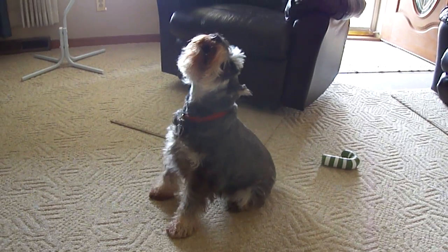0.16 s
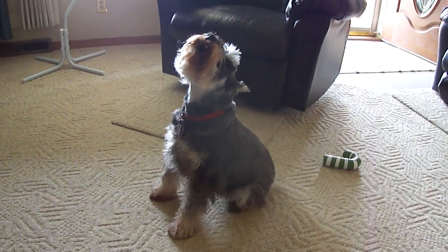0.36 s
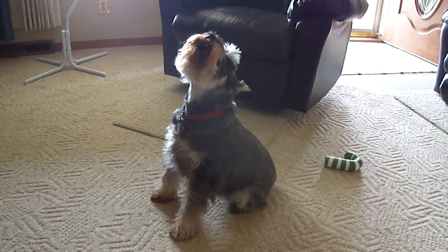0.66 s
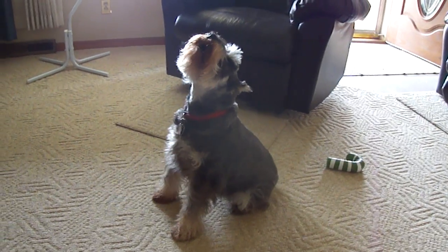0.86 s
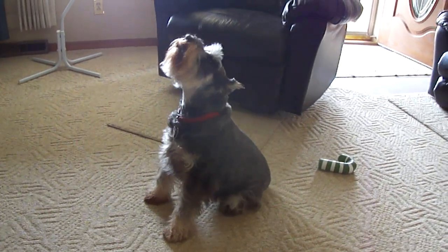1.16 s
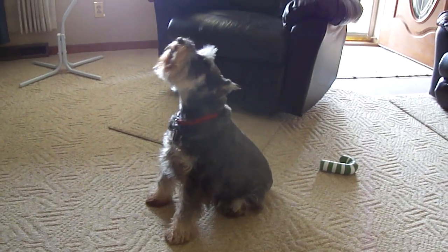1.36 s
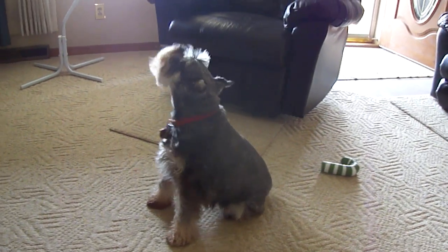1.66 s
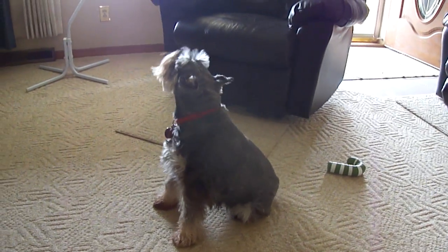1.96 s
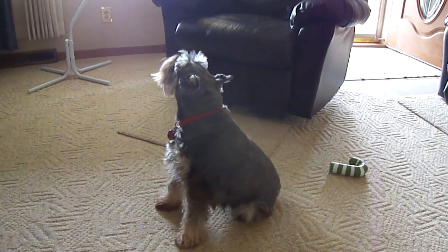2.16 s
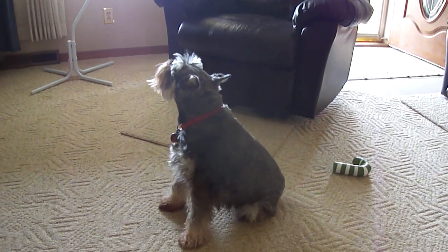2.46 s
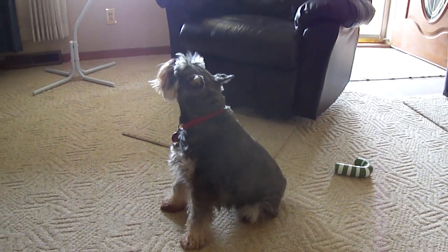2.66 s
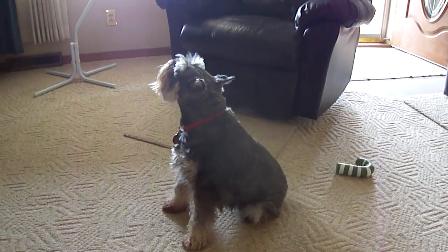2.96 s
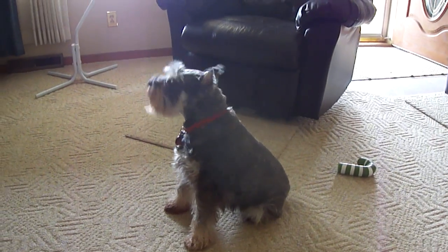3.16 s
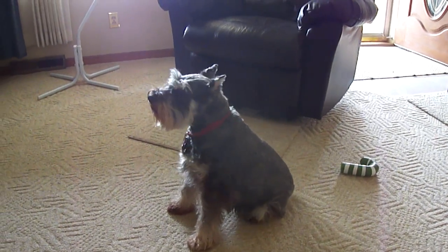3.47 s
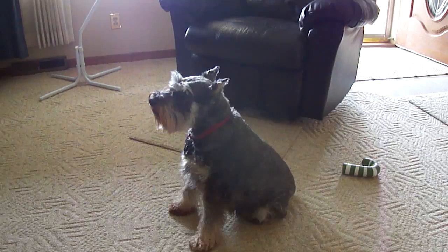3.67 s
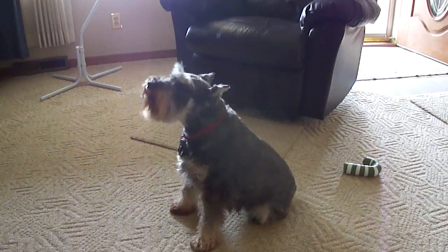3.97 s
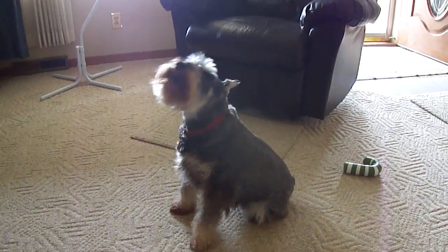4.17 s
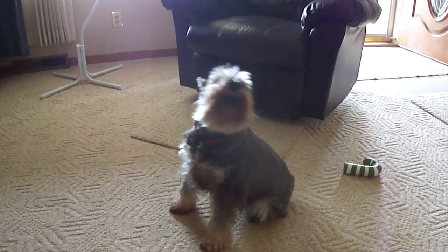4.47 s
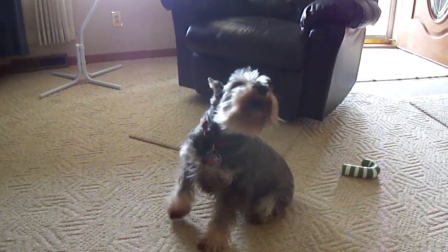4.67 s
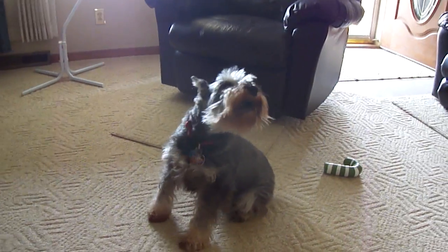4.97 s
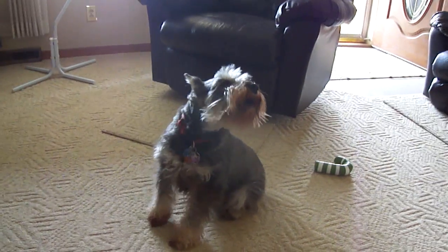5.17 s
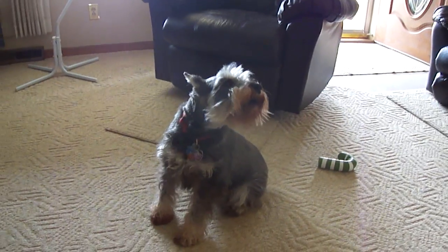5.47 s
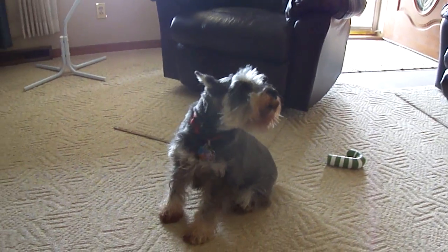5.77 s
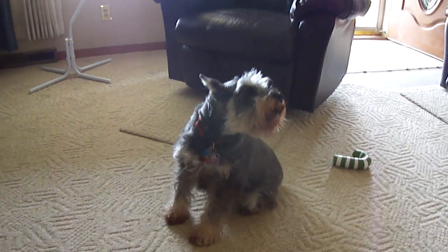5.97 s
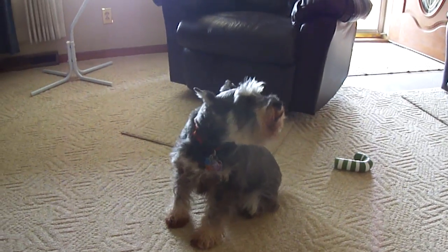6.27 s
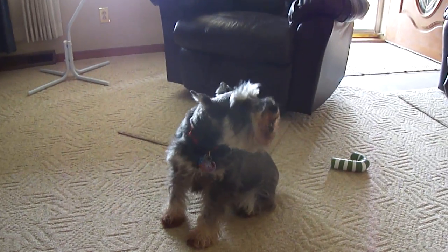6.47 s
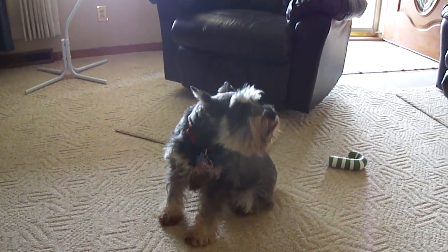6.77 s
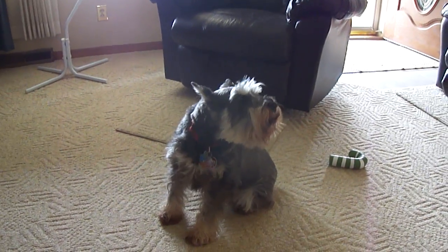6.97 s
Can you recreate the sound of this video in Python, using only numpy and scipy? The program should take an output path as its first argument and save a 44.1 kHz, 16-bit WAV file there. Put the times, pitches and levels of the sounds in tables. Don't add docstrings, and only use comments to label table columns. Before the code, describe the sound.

Three dogs vocalise together indoors. The nearest gives a long, fairly clear howl, then rapid rising and falling wails with hoarse edges, a second long sustained howl, and a final waver. Another dog adds brief, broken, high squeals and whines; a third howls lower and barks gruffly through a doorway. The microphone is close and slightly overloaded on loud notes, with short dull room echoes, low puffs and faint hiss.

```python
import sys
import numpy as np
from scipy import signal
from scipy.fft import rfft, irfft, next_fast_len
from scipy.io import wavfile
from scipy.ndimage import uniform_filter1d

SR = 44100
rng = np.random.default_rng(int(sys.argv[2]) if len(sys.argv) > 2 else 0)


def to_wav(sig):
    pcm = np.clip(np.atleast_2d(sig), -1, 1) * 32767
    pcm = np.round(pcm).astype(np.int16)
    wavfile.write(sys.argv[1], SR, pcm.T)


def to_linear_factor(level_db):
    exponent = np.asarray(level_db, float) / 20
    return 10 ** exponent


N = 313992
CUTOFF_HZ = 11050


def rms_one(x):
    return x / np.sqrt(np.mean(np.abs(x) ** 2) + 1e-20)


def loudness(x):
    return np.sqrt(np.abs(uniform_filter1d(x ** 2, size=500)))


def at_hz(points, hz):
    curve_hz, curve_db = np.array(points)[:, 0], np.array(points)[:, 1]
    return np.interp(np.log(hz), np.log(curve_hz), curve_db)


def in_span(rows, fade_s):
    s, *columns = np.transpose(rows)
    at = np.arange(int(s[0] * SR), min(int(s[-1] * SR), N))
    t = at / SR
    cut_at_start, cut_at_end = s[0] < .005, s[-1] > N / SR - .005
    rise = np.clip((t - s[0] + cut_at_start) / fade_s, 0, 1)
    fall = np.clip((s[-1] - t + cut_at_end) / fade_s, 0, 1)
    return at, [np.interp(t, s, c) for c in columns], rise * fall


def wobble(width_hz):
    white = rng.standard_normal(N) + 1j * rng.standard_normal(N)
    return rms_one(signal.sosfilt(signal.butter(3, width_hz, fs=SR, output="sos"), white))


def coloured(spectrum):
    size = next_fast_len(N)
    hz = np.maximum(np.arange(size // 2 + 1) * SR / size, 1)
    white = rfft(rng.standard_normal(size))
    return rms_one(irfft(white * to_linear_factor(at_hz(spectrum, hz)), size)[:N])


def near_phrases():
    # time_s, pitch_hz, effort_db, mouth_db
    # (mouth_db is the mouth opening: 2nd partial against effort)
    long_howls = [
        [(0.0, 564.7, -13, -10), (0.22, 473.6, -13, -14.5), (0.35, 564, -15.5, -0.5), (0.52, 580.5, -15, -3.5),
         (0.6, 554.5, -16, -3.5), (0.75, 596.7, -11.5, -8), (0.9, 575.6, -19.5, -3), (1.0, 588.2, -14, -14),
         (1.08, 459, -27.5, -12.5)],
        [(3.9, 471, -19.5, -6.5), (3.95, 577.5, -23.5, 3.5), (4.0, 625, -23.5, 1.5), (4.07, 582.4, -19.5, 2),
         (4.15, 672.4, -18, -1), (4.3, 639.3, -20, 1.5)],
        [(4.288, 636, -19.5, -2), (4.45, 653.6, -24.5, 8.5), (4.6, 623, -13.5, -9), (4.79, 611.8, -18.5, 1.5),
         (5.0, 590.2, -6.5, -21.5), (5.2, 579.2, -16, -15), (5.3, 594.9, -9.5, -19.5), (5.58, 557.8, -18.5, -6),
         (5.72, 465, -30.5, 5.5)],
    ]
    # time_s, pitch_hz, effort_db, mouth_db
    wavers = [
        [(1.54, 487.4, -14, -5), (1.62, 733.4, -29, -4), (1.84, 534.8, -21.5, -1), (1.9, 716, -19.5, -3),
         (1.96, 764, -19.5, -2), (2.18, 500, -22.5, -2), (2.245, 628.4, -13.5, -6), (2.3, 655.7, -20.5, -1.5),
         (2.5, 416.7, -22, -6)],
        [(2.66, 605, -4.5, -18), (2.7, 599, -20.5, -5.5), (2.84, 492, -18.5, -7), (2.94, 479.5, -16.5, -17),
         (3.0, 674.4, -20.5, -9), (3.05, 704.2, -22.5, 1.5), (3.2, 419, -26, -6), (3.34, 330.7, -35, -13.5)],
        [(6.14, 644, -20, 1), (6.22, 727.5, -21, -10), (6.37, 498.8, -21.5, -5.5), (6.425, 700.5, -22.5, -2),
         (6.48, 802.7, -21, 0.5), (6.67, 529.6, -23.5, -5), (6.79, 620.6, -13, -6.5), (6.9, 589, -10, -23),
         (7.12, 560.4, -24.5, -1)],
    ]
    # start_db, halfway_db, end_db
    open_levels = [
        (-38.5, -39, -7),
        (-11.5, -19.5, -18.5),
        (-29, -32, -17),
        (-22.5, -17.5, -27.5),
        (2, -4.5, -8),
        (-20, -19.5, -23.5),
    ]
    roughness = [
        (.055, 0),
        (.09, .33),
        (.03, .06),
        (.1, .06),
        (.11, .06),
        (.025, .3),
    ]
    # pitch_hz, change_db
    chest = [(335, -9), (450, -16.5), (500, -15.5), (570, -4.5), (650, 1.5), (800, 1.9)]
    rise_lean, fall_lean = .85, 0.92
    recover_per_s = 1.8

    roundness = [0.49] * len(long_howls) + [0.818] * len(wavers)
    calls, hoarseness = [], np.zeros(N)
    for points, open_db, (calm, catch), rounded in zip(long_howls + wavers, open_levels, roughness, roundness):
        s, turn_hz, effort_db, mouth_db = np.transpose(points)
        t = np.linspace(s[0], s[-1], int((s[-1] - s[0]) * 200))

        place = np.interp(t, s, np.arange(len(s)))
        leg = np.minimum(place.astype(int), len(s) - 2)
        climb = turn_hz[leg + 1] - turn_hz[leg]
        gone = (place - leg) ** np.where(climb > 0, rise_lean, fall_lean)
        hz = turn_hz[leg] + climb * (rounded * np.sin(np.pi / 2 * gone) ** 2 + (1 - rounded) * gone)

        strain = .4 * np.interp(hz, (660, 730), [0, 1])
        strain = np.maximum.accumulate(strain + recover_per_s * t) - recover_per_s * t
        slack = .28 * np.interp(-hz, (-495, -420), [0, 1])
        caught = catch * np.exp(-((t - s[0] - .07) / .05) ** 2)
        hoarse = np.minimum(calm + strain + slack + caught, .5)

        leap = np.clip(np.gradient(hz, t) / 1000, 0, 4)
        first_db = np.interp(t, s, effort_db) + leap + at_hz(chest, hz)
        second_db = np.interp(t, s, effort_db + mouth_db) + leap
        opening_db = np.interp(t, np.linspace(s[0], s[-1], len(open_db)), open_db)
        third_db = second_db + opening_db + 2.5 * leap + 3.5 * hoarse
        calls.append(np.transpose([t, hz, first_db, second_db, third_db]))
        at = np.arange(int(s[0] * SR), min(int(s[-1] * SR), N))
        hoarseness[at] = np.interp(at / SR, t, hoarse)
    return calls, hoarseness


def howl(calls, hoarseness, lift_db, count):
    # frequency_hz, level_db
    upper_colour = [(1800, 12.5), (2400, -8), (3000, -8), (3500, -10.5), (3900, -25.5), (5200, -18),
                    (6000, -37.5), (7600, -20), (9000, -28), (11000, -20.5)]
    out = np.zeros(N)
    chance = [wobble(100.0), wobble(210.0)]
    waver = wobble(5).real
    for rows in calls:
        at, (hz, first_db, second_db, third_db), edge = in_span(rows, fade_s=.012)
        hz = uniform_filter1d(hz, size=1100, mode="nearest")
        phase = 2 * np.pi * np.cumsum(hz) / SR
        mid_db = 0.91 * third_db + 0.27 * (second_db - 12)
        top_db = 0.37 * third_db + 0.69 * (second_db - 25.0)
        for k in range(1, count + 1):
            if k <= 3:
                db = [first_db, second_db, third_db][k - 1]
            else:
                force_db = np.where(k * hz > 4500, top_db, mid_db)
                db = force_db + at_hz(upper_colour, k * hz) + 8.8 * np.roll(waver, 9973 * k)[at]
            spread = np.clip(hoarseness[at] * (k - .6) ** .7, 0, .96)
            thirds = 2.2 * (k > 1) * hoarseness[at] * np.cos(phase / 3 + k)
            uneven = .75 * np.roll(chance[k > 1], 977 * k)[at] + thirds
            flow = np.sqrt(1 - spread ** 2) + spread * uneven
            heard = edge * (k * hz < CUTOFF_HZ)
            out[at] += heard * to_linear_factor(db + lift_db) * np.real(flow * np.exp(1j * k * phase))
    return out


def yelps():
    # start_s, length_s, first_hz, last_hz, loudest_db
    swells = [(0.258, .18, 1244, 1510, -44.5), (.47, 0.055, 1019, 1202, -18), (.78, .03, 1181, 887, -27.5),
              (1.075, 0.039, 1600, 1255, -29.5), (1.35, 0.054, 1773, 1868, -32.5),
              (2.418, 0.071, 1760, 1610, -29), (2.461, 0.05, 1324, 1208, -26.5),
              (3.608, 0.1, 1320, 982, -29.5), (3.706, 0.086, 847.5, 979, -23),
              (4.876, 0.045, 1515, 1013, -30.5), (5.19, 0.053, 877, 1205, -40.5),
              (5.356, 0.052, 1030, 1180, -32), (6.114, 0.027, 1016, 1150, -21),
              (6.37, 0.1, 1783, 1834, -32), (6.555, 0.17, 1415, 1348, -36.5)]
    # start_s, length_s, crest_hz, last_hz, loudest_db
    fades = [(0, 0.17, 1297, 1256, -27.5), (0.061, 0.11, 1765, 1637, -31.5),
             (0.864, 0.061, 1800, 1684, -31.5), (0.119, 0.2, 1570, 1195, -34.5),
             (0.522, 0.089, 1907, 1850, -31), (0.92, 0.16, 1872, 1815, -35.5),
             (1.167, 0.099, 1840, 1600, -29.5), (1.254, 0.23, 1432, 1330, -33.5),
             (1.62, 0.071, 1800, 1700, -40), (1.669, 0.098, 1930, 1770, -38.5),
             (2.388, 0.18, 1530, 1427, -33), (3.408, 0.069, 1137, 1210, -22),
             (3.792, 0.075, 1073, 1003, -25), (3.852, 0.1, 1245, 1150, -26),
             (4.556, 0.068, 1063, 1180, -34), (4.579, 0.19, 1850, 1730, -39.5),
             (4.922, 0.17, 1889, 1680, -37), (6.17, 0.027, 1183, 1440, -28.5),
             (6.699, 0.18, 1758, 1670, -42)]
    # start_s, length_s, first_hz, last_hz, level_db
    whines = [(0.55, 0.07, 1189, 1324, -30.5), (0.82, 0.047, 912, 1210, -29.5),
              (1.117, 0.062, 1274, 1255, -28.5), (1.233, 0.025, 1297, 1260, -24.5),
              (2.609, 0.059, 1312, 1493, -31.5), (3.448, 0.15, 1736, 1572, -38),
              (3.796, .12, 1807, 1590, -38.5), (4.665, 0.047, 1745, 1455, -52),
              (4.758, 0.052, 1430, 1380, -46.5), (5.4, 0.14, 1785, 1933, -46),
              (5.687, 0.096, 942, 1313, -35.5), (5.787, 0.14, 1348, 1264, -40),
              (6.8, 0.33, 1290, 1350, -44.5)]
    # pitch_hz, level_db
    second = [(950, -10.5), (1150, -24), (1350, -18.5), (1650, -7), (1900, -16.5)]

    calls = [[(s, first, db - 11.5), (s + length, last, db)] for s, length, first, last, db in swells]
    for s, length, crest, last, db in fades:
        crest_s = s + min(0.29 * length, .032)
        drop_db = 14 if crest > 1700 else 21.5
        calls.append([(s, crest * (1 - .08), db - 2.5), (crest_s, crest, db), (s + length, last, db - drop_db)])
    calls += [[(s, first, db), (s + length, last, db)] for s, length, first, last, db in whines]
    return [[(s, hz, db, db + at_hz(second, hz)) for s, hz, db in rows] for rows in calls]


def squeals(calls, hoarse):
    partials_db = [-6, -15, -20]
    out, strain, chance = np.zeros(N), np.zeros(N), wobble(100.0)
    for rows in calls:
        at, (hz, first_db, second_db), edge = in_span(rows, fade_s=0.0062)
        effort = np.clip((hz - 1000) / 400, .4, 1)
        strain[at] += edge * effort * to_linear_factor(first_db)
        phase = 2 * np.pi * np.cumsum(uniform_filter1d(hz, size=500, mode="nearest")) / SR
        upper_db = [second_db + re_db - 17 * (effort - .2) for re_db in partials_db]
        for k, db in enumerate([first_db, second_db] + upper_db, 1):
            flow = 1 + hoarse * effort * k ** 1.2 * np.roll(chance, 977 * k)[at]
            out[at] += edge * to_linear_factor(db + 6.0) * np.real(flow * np.exp(1j * k * phase))
    return out, strain


def far_calls():
    # start_s, loudest_s, end_s, pitch_hz, level_db (a row whose end_s lies before its start_s stays
    howls = [
        (0.257, 0.393, 0.4, 378, -41),
        (1.331, 1.501, 1.476, 362.6, -31),
        (1.553, 1.663, 1.68, 340, -27.5),
        (3.062, 3.103, 3.06, 353.6, -38.5),
        (5.897, 6.008, 6.13, 316.7, -55),
        (6.142, 6.29, 6.13, 335, -30),
        (6.432, 6.594, 5.67, 353, -36),
    ]
    # time_s, pitch_hz, level_db
    whoop = [
        (2.5, 249.3, -48.5),
        (2.57, 263.3, -52),
        (2.619, 331, -37),
        (2.66, 417, -35),
    ]
    # frequency_hz, level_db
    throat = [(260, -10), (350, -32), (520, 2), (690, 0.6), (960, 0.5), (1030, -19), (1230, -4.5)]
    sag_hz_per_s, rise_db_per_s, fall_db_per_s = 45, 102.5, 83

    calls = [whoop]
    for start, top, end, hz, db in howls:
        moments = [(start, rise_db_per_s), (top, 0), (end, fall_db_per_s)]
        calls.append([(s, hz - sag_hz_per_s * (s - top), db - rate * abs(s - top)) for s, rate in moments])
    first_three = np.arange(1, 4)
    return [[(s, hz, *(db + at_hz(throat, hz * first_three))) for s, hz, db in rows] for rows in calls]


def barks():
    # start_s, level_db, decay_s (time to fall 60 dB)
    bark_times = [
        (0.281, -34.5, 0.99),
        (1.555, 1.5, 0.047),
        (3.97, -21.5, 0.28),
        (4.293, -13, 0.14),
        (5.2, -36.5, 0.39),
        (6.15, -10.5, 0.074),
    ]
    t = np.arange(N) / SR
    pulse_hz = 185 * (1 + 0.21 * wobble(65.0).real)
    pulses = np.diff(np.floor(np.cumsum(pulse_hz) / SR), prepend=0)
    gruff = rms_one(pulses) + 0.2 * rng.standard_normal(N)
    throat = signal.butter(6, [500, 1550], "band", fs=SR, output="sos")
    gruff = rms_one(signal.sosfilt(throat, gruff))
    shape = np.zeros(N)
    for s, db, decay_s in bark_times:
        rise = np.clip((t - s) / .014, 0, 1) ** 2
        shape += rise * to_linear_factor(db - 60 * np.abs(t - s) / decay_s)
    return gruff * shape


def rasp(near, hoarseness, strain):
    # frequency_hz, level_db (per Hz)
    growl_colour = [(400, -34), (800, 8.5), (1700, 16.5), (2400, -0.5), (3100, 13.5), (3900, -17),
                    (5000, -24), (6000, -16), (8000, -9.5), (11000, -39)]
    # frequency_hz, level_db (per Hz)
    wheeze_colour = [(350, -43), (700, 8.5), (1200, 22.5), (1900, 19), (2500, 5.5), (3400, 5), (4100, 2.5),
                     (4900, 9), (6000, -40), (7800, -22.5), (11000, -12)]
    growl = to_linear_factor(-6.5) * hoarseness ** 1.41 * loudness(near) * coloured(growl_colour)
    wheeze = to_linear_factor(-5.5) * loudness(strain) * coloured(wheeze_colour)
    return (growl + wheeze) * to_linear_factor(3.5 * wobble(60).real)


def room(x):
    t = np.arange(int(.8 * SR)) / SR
    dull = np.exp(-2 * np.pi * 7300 / SR)
    echoes = signal.lfilter([1], [1, -dull], rng.standard_normal(len(t))) * (t > .006)
    room_t60_s, hall_t60_s = 0.2, 0.6
    echoes *= to_linear_factor(-60 * t / room_t60_s) + to_linear_factor(-16 - 60 * t / hall_t60_s)
    return signal.fftconvolve(x, echoes / np.sqrt(np.sum(echoes ** 2)))[:N]


def puffs():
    # middle_s, level_db, half_length_s
    puff_times = [(.01, -39, 0.0087), (.32, -35.5, 0.031), (.89, -35.5, .025), (1.17, -33.5, 0.064),
                  (1.27, -38.5, 0.032), (1.35, -65, 0.011), (1.42, -34.5, 0.11), (1.568, -33, .001),
                  (1.58, -44, 0.081), (3.0, -65, 0.015), (3.99, -49, .02), (7.115, -46, 0.0084),
                  (5.0, -40.5, 0.035), (6.17, -38.5, .03)]
    # frequency_hz, level_db (per Hz)
    puff_colour = [(60, -30), (130, -0.5), (200, -6), (400, 2.5), (900, 5), (3000, -15.5), (10000, -32.5)]
    t = np.arange(N) / SR
    lumps = sum(to_linear_factor(db) * np.exp(-((t - s) / half_s) ** 2) for s, db, half_s in puff_times)
    return coloured(puff_colour) * lumps


def hiss(dogs):
    # frequency_hz, level_db (per Hz)
    hiss_colour = [(30, -2.5), (70, -11.5), (125, -7.5), (200, 0), (500, 2.5), (1500, 7), (5000, -8.5),
                   (11000, -18.5)]
    duck = 1 / (1 + 9.2 * uniform_filter1d(loudness(dogs), size=4000))
    return duck * to_linear_factor(-51) * coloured(hiss_colour)


def scene():
    phrases, hoarseness = near_phrases()
    near = howl(phrases, hoarseness, lift_db=0.5, count=19)
    high, strain = squeals(yelps(), hoarse=0.12)
    far = howl(far_calls(), np.full(N, .08), lift_db=12.0, count=4) + barks()
    air = rasp(near, hoarseness, strain)
    wet = room(to_linear_factor(-5.5) * near + to_linear_factor(-0.5) * far + to_linear_factor(-6.0) * high + to_linear_factor(-9) * air)
    dogs = near + far + high + air + wet
    return (dogs + puffs() + hiss(dogs))[None]


def low_pass(x):
    return signal.sosfilt(signal.butter(12, 11060, fs=SR, output="sos"), x)


def record(dry):
    bent = 1.344 * np.tanh(dry / .85)
    x = signal.sosfilt(signal.butter(2, 108, "high", fs=SR, output="sos"), bent)
    x = signal.sosfilt(signal.cheby2(12, 45, CUTOFF_HZ, fs=SR, output="sos"), x)
    return low_pass(x)


dry = scene()
out = record(dry)
to_wav(out)
```